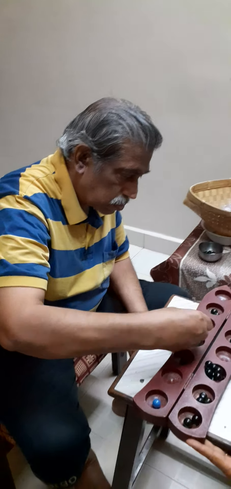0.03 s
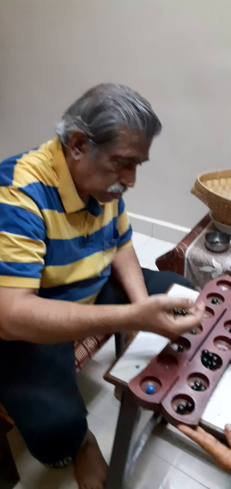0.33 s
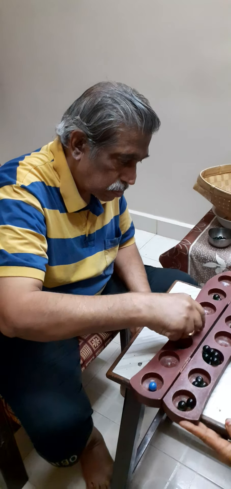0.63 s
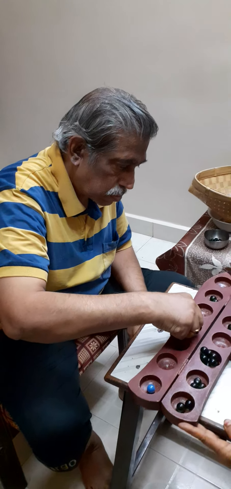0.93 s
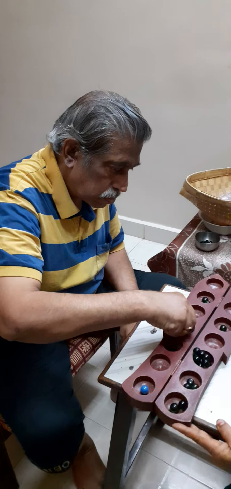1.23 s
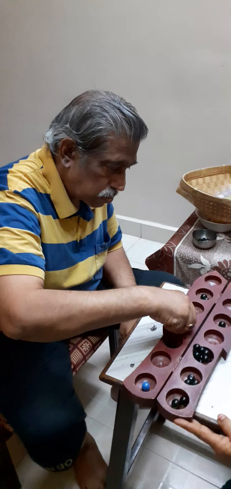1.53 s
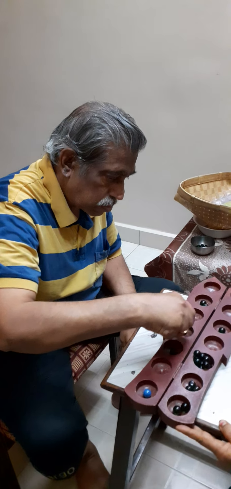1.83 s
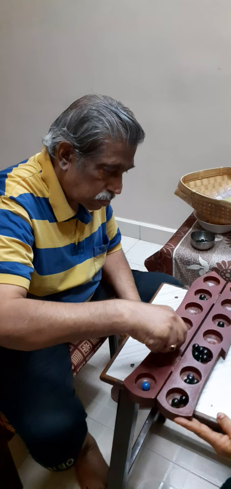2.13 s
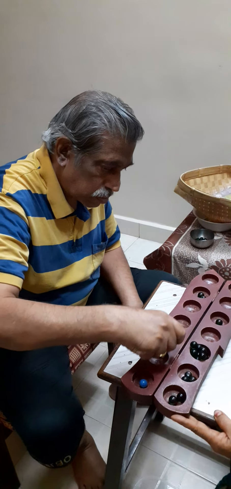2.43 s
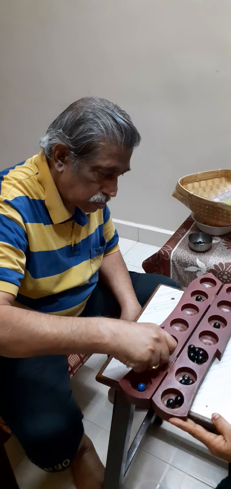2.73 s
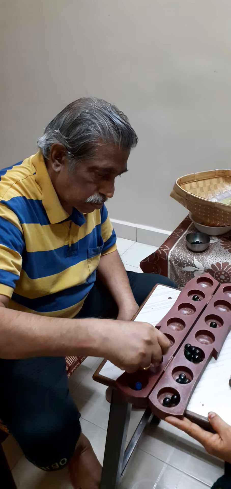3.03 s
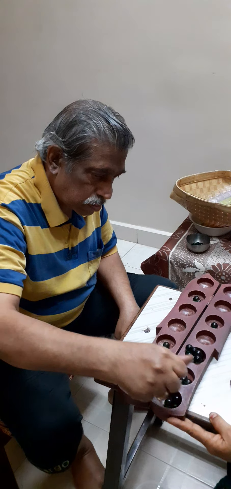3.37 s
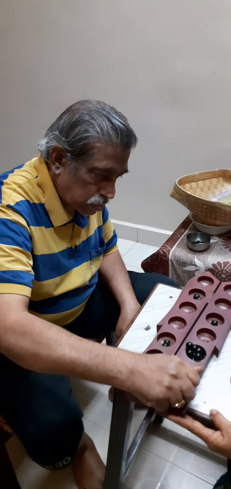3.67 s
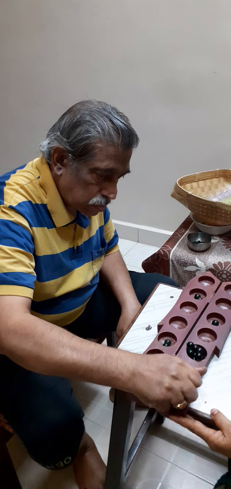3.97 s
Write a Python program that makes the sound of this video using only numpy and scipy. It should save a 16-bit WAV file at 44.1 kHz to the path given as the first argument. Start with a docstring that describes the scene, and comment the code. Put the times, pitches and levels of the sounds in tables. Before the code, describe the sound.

Marbles clicking in a hand, then clattering into wooden hollows, with a soft fan hum.

```python
"""Over a humming fan, fingers nudge glass marbles in the pits of a wooden game board.
Marbles clink in the hand, then drop into one pit and, by way of the rim, into a second.
Each blow rings the wood's modes, with a sharp crack, a thin glassy ring and the pit's hollow pop;
the marbles bounce and roll to rest. A small hard-walled room reflects the marble sounds."""
import sys
import numpy as np
from scipy import signal
from scipy.fft import rfft, irfft, next_fast_len
from scipy.io import wavfile
from scipy.ndimage import uniform_filter1d

SR = 44100
rng = np.random.default_rng(int(sys.argv[2]) if len(sys.argv) > 2 else 0)


def output_pcm(signal):
    """Save a mono or channel-first signal as 16-bit PCM at the path in sys.argv[1].

    Samples are clipped to [-1, 1] before scaling.
    """
    pcm = np.clip(np.atleast_2d(signal).T, -1, 1) * 32767
    wavfile.write(sys.argv[1], SR, np.round(pcm).astype(np.int16))


N = 176400


def from_db(db):
    """Decibels to gain."""
    return 10 ** (np.asarray(db) / 20)


def at_hz(points, hz):
    """Interpolate a table along log frequency."""
    table_hz, values = np.transpose(points)
    return np.interp(np.log(hz + 1e-3), np.log(table_hz), values)


def bins_hz(size):
    """Frequencies of a spectrum's bins."""
    return np.arange(size // 2 + 1) * SR / size


def unit_rms(x):
    """Scale to rms 1."""
    return x / np.sqrt(np.mean(x ** 2) + 1e-20)


def decay(t, t60_s):
    """Exponential fade, 60 dB down at t60_s."""
    return np.exp(-np.log(1000) * t / t60_s)


def cut(x, hz, kind="low", order=2):
    """Butterworth low- or high-pass."""
    return signal.sosfilt(signal.butter(order, min(hz, .45 * SR), kind, fs=SR, output="sos"), x + 1e-18)


def pan(right_db):
    """Gains: left down, right up by right_db."""
    return from_db(np.array([[-1], [1]]) * right_db)


def add(out, start_s, sound):
    """Mix a short sound in at start_s."""
    i = int(np.clip(start_s * SR, 0, N - 1))
    out[i:i + len(sound)] += sound[:N - i]


def stereo_noise(likeness, size):
    """Spectra of two partly correlated white noises."""
    mid, side = rfft(rng.standard_normal((2, size)))
    correlation = np.clip(at_hz(likeness, bins_hz(size)), -.99, .99)
    return (np.sqrt(1 + correlation) * mid + np.sqrt(1 - correlation) * side * [[1], [-1]]) / np.sqrt(2)


def flatten(noise, fade, width_bins):
    """Filter noise so that, once faded, no band stands out."""
    power = uniform_filter1d(np.abs(rfft(noise * fade)) ** 2, width_bins)
    return irfft(rfft(noise) / np.sqrt(power + 1e-12))


def snap(spectrum, rise_s, size=1024):
    """Hard contact: a coloured burst that swells and dies within milliseconds."""
    age = np.arange(size) / SR / rise_s
    fade = age * np.exp(1 - age)
    noise = flatten(rng.standard_normal(size), fade, width_bins=15)
    coloured = irfft(rfft(noise * fade) * from_db(at_hz(spectrum, bins_hz(size))))
    burst = coloured * np.minimum(2 * age, 1) * np.exp(-age / 10)
    return .5 * unit_rms(burst) * np.sqrt(rise_s * SR / size)


def patter(runs, touches_per_s):
    """Random tiny touches that swell and fade over each run."""
    t = np.arange(N) / SR
    swell = sum(from_db(level_db) * np.sin(np.pi * np.clip((t - start_s) / length_s, 0, 1))
                for start_s, length_s, level_db in runs)
    return swell * (rng.random(N) < touches_per_s / SR) * rng.standard_normal(N)


# air noise: freq_hz, relative_db
AIR_SPECTRUM = [(45, -36), (60, -12), (81, -11.5), (110, -6.5), (184, -10), (225, -5), (336, -2.5),
                (480, -15.5), (700, -16), (1220, -19.5), (1540, -21), (1810, -28), (2550, -35.5),
                (2980, -45), (4000, -52), (6000, -56), (9000, -52), (16000, -60)]
# air noise, left against right: freq_hz, correlation
AIR_LIKENESS = [(60, 0.77), (150, 1), (330, 0.82), (700, 0), (1500, 0), (12000, 0)]
# fan direction: freq_hz, right_db
FAN_BALANCE = [(60, 1.36), (280, 2.5), (700, 2), (2500, 3), (6000, 2)]
# motor hum: pitch_hz, level_db
MOTOR_TONES = [(73.5, -57.5), (224, -59.5), (338, -58.5), (1499, -66.5), (1599, -70.5)]


def fan(air_db=-46.5, waver_depth=.25, highpass_hz=45.8):
    """Steady moving air with a few wavering motor tones."""
    hz, t = bins_hz(N), np.arange(N) / SR
    air = stereo_noise(AIR_LIKENESS, N) * from_db(at_hz(AIR_SPECTRUM, hz)) * pan(at_hz(FAN_BALANCE, hz))
    out = from_db(air_db) * unit_rms(irfft(air))
    for pitch_hz, level_db in MOTOR_TONES:
        level_drift = unit_rms(cut(rng.standard_normal(N), hz=3.4))
        phase_drift = unit_rms(cut(rng.standard_normal(N), hz=2.7))
        waver = 1 + waver_depth * (level_drift + 1j * phase_drift)
        tone = np.real(waver * np.exp(2j * np.pi * pitch_hz * t))
        out += from_db(level_db) * unit_rms(tone) * pan(at_hz(FAN_BALANCE, pitch_hz))
    return cut(out, highpass_hz, "high", order=4)


# finger pushes: start_s, level_db
PUSHES = [(.002, -35), (0.165, -34.5), (0.289, -39), (0.311, -35), (0.441, -31), (0.525, -37.5),
          (0.616, -40.5), (.679, -37.5), (0.732, -35), (0.754, -40), (0.787, -50), (1.15, -60),
          (1.266, -38.5), (1.335, -50), (1.39, -58), (3.368, -42), (3.42, -40.5), (3.503, -44.5),
          (3.574, -41.5), (3.641, -38), (3.66, -38.5), (3.822, -45.5), (3.883, -39.5), (3.961, -40.5)]
# pit under light touches: freq_hz, relative_db
PIT_SPECTRUM = [(300, -13.5), (700, -11.5), (1200, -14.5), (1850, -17.5), (2090, -1), (2250, -4.5),
                (2420, -15), (2620, -15.5), (3200, -32), (6000, -47)]


def nudges(rise_s=.0027, fall_s=.011, touches_per_s=4000, gain_db=-8.5):
    """Fingers roll marbles briefly on the wood; fine touches wake mainly the pit's resonance."""
    touches = (rng.random(N) < touches_per_s / SR) * rng.choice([-1, 1], N)
    grain = unit_rms(irfft(rfft(touches) * from_db(at_hz(PIT_SPECTRUM, bins_hz(N)))))
    steady_grain = grain / np.sqrt(uniform_filter1d(grain ** 2, size=900) + 1e-6)
    t = np.arange(SR // 4) / SR
    push = np.minimum(t / rise_s, 1) * np.exp(-t / fall_s)
    power = np.zeros(N)
    for start_s, level_db in PUSHES:
        add(power, start_s, (from_db(level_db + gain_db) * push) ** 2)
    return steady_grain * np.sqrt(power)


# marbles shifting in the fist: start_s, length_s, level_db
FIST_JOSTLES = [(.17, 0.076, -62.5), (.345, 0.11, -37), (.442, 0.035, -36.5), (2.772, 0.038, -56)]
# marble against marble: start_s, level_db, lowpass_hz
GLASS_HITS = [(0.31, -21, 11900), (.3695, -29, 9900), (0.3766, -27.5, 12900), (0.397, -24, 11540),
              (0.4344, -17, 12770), (0.46, -23, 12900), (0.4662, -21, 13200), (0.4705, -28, 11000),
              (2.771, -32.5, 6080), (2.791, -31, 5500), (2.865, -32, 4700), (2.885, -33.5, 4500),
              (2.9725, -4.5, 4500), (3.767, -40.5, 7900), (3.84, -46.5, 8100)]
# glass click: freq_hz, relative_db
GLASS_SPECTRUM = [(1000, -24.5), (2800, -21.5), (3800, -7.5), (5000, -8), (6600, -1.5), (7400, -4),
                  (8300, 3), (9900, -5), (11200, -1), (15500, -8)]


def clinks(rise_s=.0007):
    """Glass on glass: very short, bright clicks among finer jostling."""
    touches = patter(FIST_JOSTLES, touches_per_s=900)
    out = signal.fftconvolve(touches, snap(GLASS_SPECTRUM, rise_s))[:N]
    for start_s, level_db, lowpass_hz in GLASS_HITS:
        add(out, start_s, from_db(level_db) * cut(snap(GLASS_SPECTRUM, rise_s), lowpass_hz, order=3))
    return out


# wooden board: pitch_hz, t60_s, first_pit_db, rim_db, second_pit_db
BOARD_MODES = [(200, 0.048, -40.5, -35, -27.5), (330.6, 0.047, -23.5, -26.5, -25),
               (474, 0.092, -26, -21, -27), (600, 0.02, -22.5, -26, -39), (860, 0.031, -27.5, -24.5, -26.5),
               (1180, 0.024, -18, -18.5, -25), (1357, 0.026, -18, -14, -22), (1763, .016, -17, -19.5, -21),
               (2173, 0.03, -16, -6.5, -11), (2254, 0.043, -26.5, -14.5, -14.5),
               (2435, 0.0191, -15, -13.5, -10), (2780, .012, -10, -19, -6.5),
               (3250, 0.0143, -8.5, -19, -11.5), (4250, 0.023, -17, -14.5, -17.5),
               (4970, .016, -30, -11.5, -17.5), (6280, 0.01, -20.5, -13, -28)]


def knock(spot, thud_db, thud_below_hz=1850, scatter_db=2, detune=.02, detune_above_hz=2500):
    """The board's modes struck at one spot; the high ones shift with the point of contact."""
    pitch_hz, t60_s, first_pit_db, rim_db, second_pit_db = np.transpose(BOARD_MODES)[:, :, None]
    t = np.arange(8192) / SR
    level_db = {"first pit": first_pit_db, "rim": rim_db, "second pit": second_pit_db}[spot]
    level_db = level_db + thud_db * (pitch_hz < thud_below_hz)
    level_db += scatter_db * rng.standard_normal(pitch_hz.shape)
    shift = detune * (pitch_hz > detune_above_hz) * rng.standard_normal(pitch_hz.shape)
    modes = decay(t, t60_s) * np.sin(2 * np.pi * pitch_hz * (1 + shift) * t)
    signs = (-1) ** np.arange(len(pitch_hz))[:, None]
    return np.sum(signs * from_db(level_db) * modes, axis=0)


def glass_ring(t, centre_hz=8850, spread=.034, t60_s=.04):
    """A cluster of close glassy modes."""
    pitch_hz = centre_hz * (1 + spread * rng.uniform(-1, 1, size=(8, 1)))
    cluster = np.sum(np.sin(2 * np.pi * (pitch_hz * t + rng.random(pitch_hz.shape))), axis=0)
    return decay(t, t60_s) * unit_rms(cluster) / np.sqrt(2)


# marble on board: start_s, spot, level_db, lowpass_hz, thud_db, crack_db, pop_db, ring_db
LANDINGS = [(2.2847, "first pit", -19, 5500, 6, 4.5, -10, -22.5),
            (2.3254, "first pit", -24, 5030, 3, 8, -13, -24),
            (2.3452, "first pit", -18, 3330, 6.5, -7, -9, -30.5),
            (2.352, "first pit", -23, 3270, -14, -19.5, -3, -33),
            (2.3773, "first pit", -24, 3170, -20, -5, -4, -30),
            (2.3998, "first pit", -19, 3430, -2, -6, -4, -32),
            (2.4109, "first pit", -32, 3500, -5.5, 5, -10, -25),
            (2.418, "first pit", -27, 3620, 6, -1.5, -1, -33),
            (2.449, "first pit", -32, 3000, -9, -5.5, -4, -28),
            (2.9725, "rim", -10, 5000, 3.5, -13, -8.5, -47), (2.9738, "rim", -15, 5700, 2.5, -5, 0.5, -38),
            (3.0514, "second pit", -7.5, 2530, -5.5, -8, -0.5, -47),
            (3.114, "second pit", -12.5, 2400, -0.5, -22, -6, -38.5),
            (3.1459, "second pit", -15, 2640, -1, -9.5, -12, -33.5),
            (3.188, "second pit", -28, 2760, 2.5, -18, -4, -38),
            (3.203, "second pit", -34.5, 2580, 8, -9, -7, -30)]
# contact crack: freq_hz, relative_db
CRACK_SPECTRUM = [(300, 3), (1400, 0), (3300, 8.5), (5500, -2.5), (7400, -12), (9000, -9.5), (10200, -11.5),
                  (12000, -7.5), (16000, -10.5)]
# hollow pop: spot -> pitch_hz
POP_PITCH_HZ = {"first pit": 3140, "rim": 1700, "second pit": 2540}


def drops(crack_rise_s=.0012, crack_gain_db=-5, pop_rise_s=.00036):
    """Each landing or bounce: a wooden knock, a crack with a glassy ring, the cupped pit's pop."""
    wood, crack, pop = np.zeros((3, N))
    t = np.arange(4096) / SR
    pop_swell = (t / pop_rise_s * np.exp(1 - t / pop_rise_s)) ** 2
    for start_s, spot, level_db, lowpass_hz, thud_db, crack_db, pop_db, ring_db in LANDINGS:
        add(wood, start_s, from_db(level_db) * cut(knock(spot, thud_db), lowpass_hz))
        burst = snap(CRACK_SPECTRUM, crack_rise_s)
        add(crack, start_s, from_db(level_db + crack_db + crack_gain_db) * burst)
        add(crack, start_s, from_db(level_db + ring_db) * glass_ring(t))
        pit_tone = np.sin(2 * np.pi * POP_PITCH_HZ[spot] * t)
        add(pop, start_s, from_db(level_db + pop_db) * pop_swell * pit_tone)
    return wood, crack, pop


# marble circling its pit: spot -> start_s, length_s, level_db
PIT_ROLLS = {"first pit": (2.29, 0.099, -45.5), "second pit": (3.05, 0.19, -45)}


def rolls(lowpass_hz=3000):
    """A rolling marble is a run of tiny knocks."""
    out = np.zeros(N)
    for spot, run in PIT_ROLLS.items():
        out += signal.fftconvolve(patter([run], touches_per_s=310), knock(spot, thud_db=8))[:N]
    return cut(out, lowpass_hz)


# table-top bounce, left then right: delay_s, gain
TABLE_BOUNCES = [(.0009, 0.3), (.00135, 0.31)]


def near(x, left_lag_s=.00002):
    """Direct sound, slightly later on the left, plus its first bounce off the table."""
    size = next_fast_len(N + SR // 10)
    phase_per_s = -2j * np.pi * bins_hz(size)
    paths = [np.exp(phase_per_s * lag_s) * (1 + gain * np.exp(phase_per_s * delay_s))
             for lag_s, (delay_s, gain) in zip((left_lag_s, 0), TABLE_BOUNCES)]
    return irfft(rfft(x, size) * paths, size)[:, :N]


# reverberation: freq_hz, t60_s
ROOM_DECAY = [(150, 0.48), (500, 0.63), (2200, 0.32), (4500, 0.34), (8000, 0.29), (15000, 0.14)]
# reverberation, left against right: freq_hz, correlation
TAIL_LIKENESS = [(100, 0.87), (300, 0.95), (700, 0), (2200, 0.07), (5000, 0), (15000, 0)]


def room(x, gap_s=.005, build_s=.002, gain_db=2.5, size=32768):
    """Dense reflections off bare walls and tiles; the treble dies first."""
    t = np.arange(size) / SR
    onset = np.clip((t - gap_s) / build_s, 0, 1)
    fades = [onset * decay(t, t60_s) for _, t60_s in ROOM_DECAY]
    noise = irfft(stereo_noise(TAIL_LIKENESS, size))
    spectrum = rfft(flatten(noise, np.mean(fades, axis=0), width_bins=61))
    tail = 0
    for (centre_hz, _), fade in zip(ROOM_DECAY, fades):
        band = at_hz([(hz, hz == centre_hz) for hz, _ in ROOM_DECAY], bins_hz(size))
        tail = tail + irfft(spectrum * band) * fade
    return from_db(gain_db) * signal.fftconvolve(x[None], unit_rms(tail) / np.sqrt(size), axes=1)[:, :N]


def scene(board_highpass_hz=142):
    """Board, hand and fan, all a little to the right."""
    wood, crack, pop = drops()
    wood, crack, pop = cut(np.array([wood + rolls(), crack, pop]), board_highpass_hz, "high")
    glass, nudged = clinks(), nudges()
    # The pit aims its pop up at the listener, so little reaches the walls.
    to_walls = wood + from_db(.5) * crack + from_db(-13) * pop + from_db(-1) * nudged
    board = near(wood + crack + pop + nudged) * pan(right_db=2) + room(to_walls) * pan(right_db=1.54)
    hand = (near(glass) + from_db(-2) * room(glass)) * pan(right_db=1.6)
    return board + hand + fan()


def record(dry):
    """Steep low-pass at 15.9 kHz."""
    return signal.sosfilt(signal.ellip(10, .3, 70, 15900, fs=SR, output="sos"), dry)


dry = scene()
out = record(dry)
output_pcm(out)
```